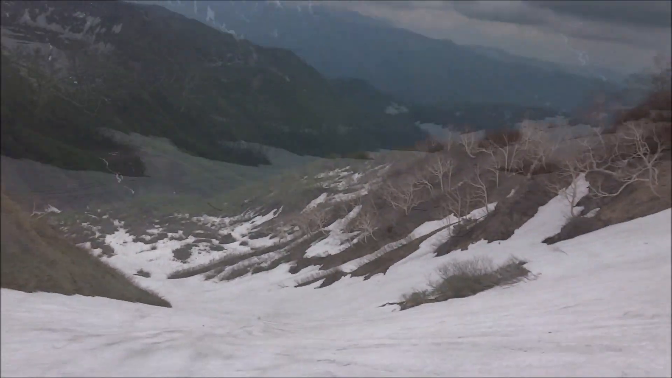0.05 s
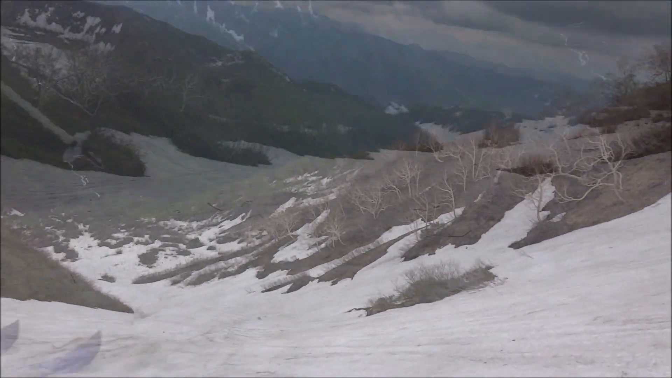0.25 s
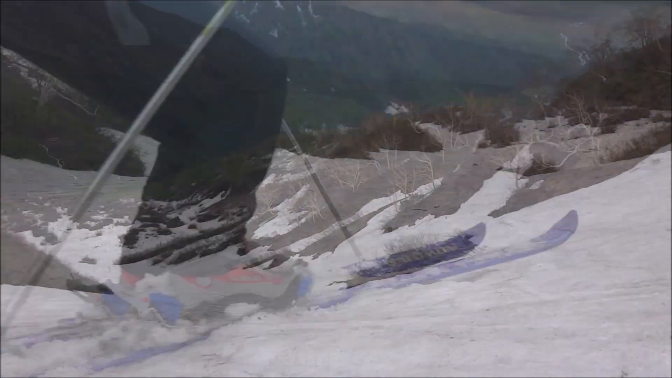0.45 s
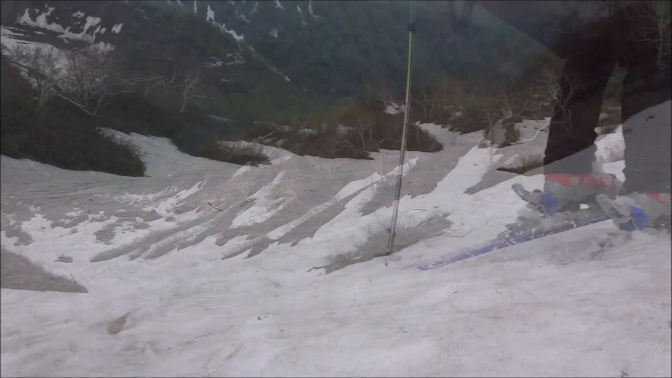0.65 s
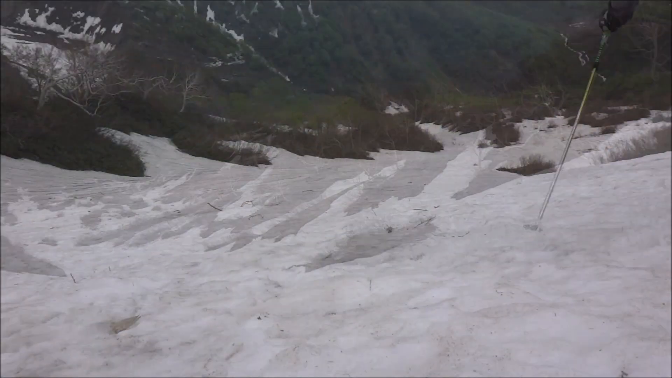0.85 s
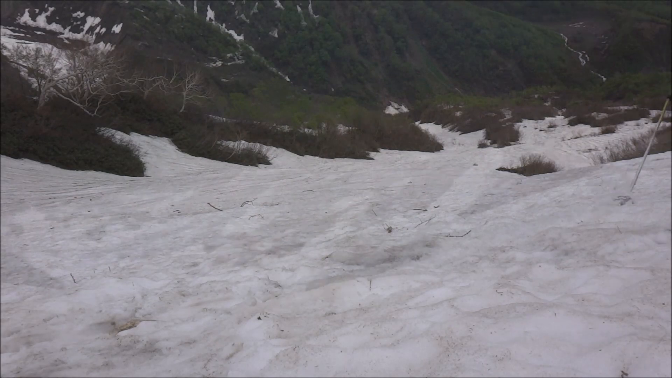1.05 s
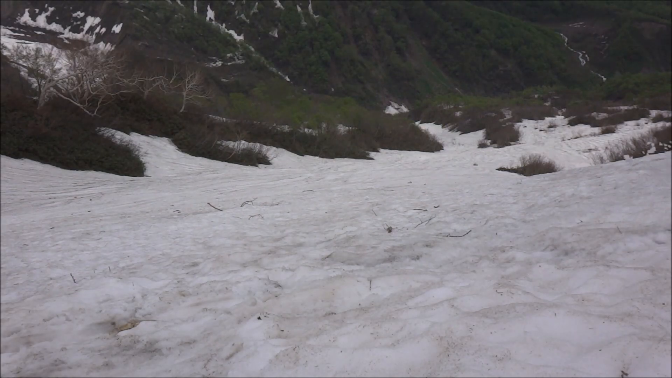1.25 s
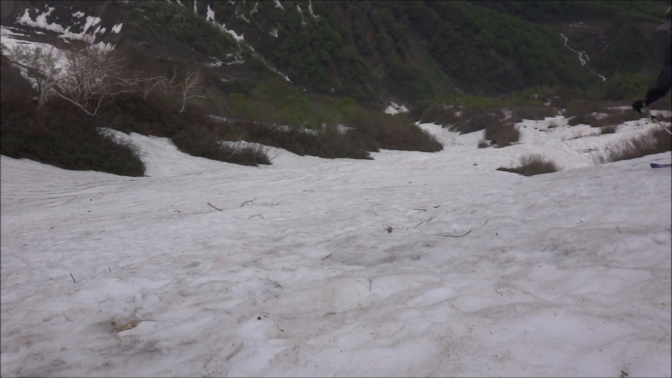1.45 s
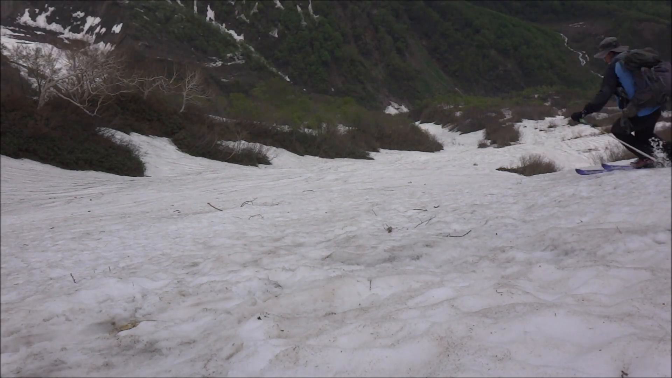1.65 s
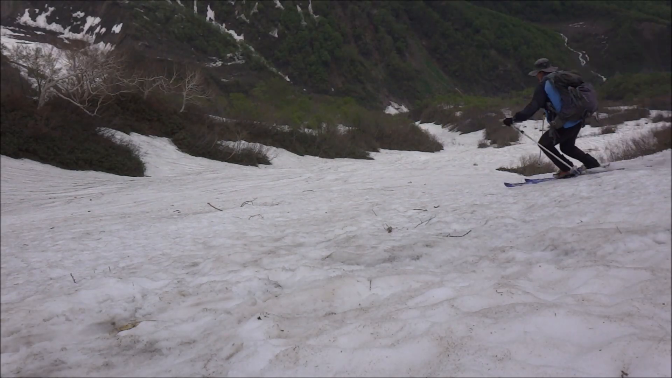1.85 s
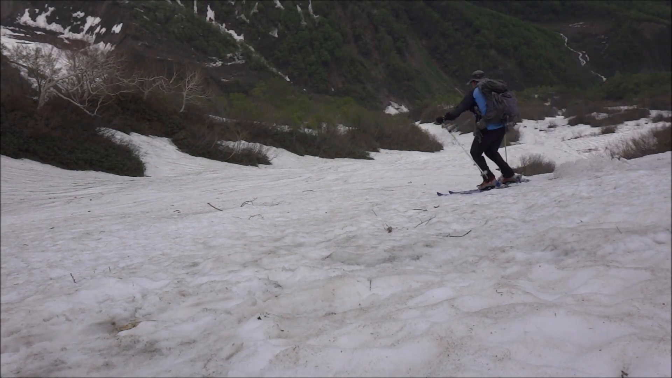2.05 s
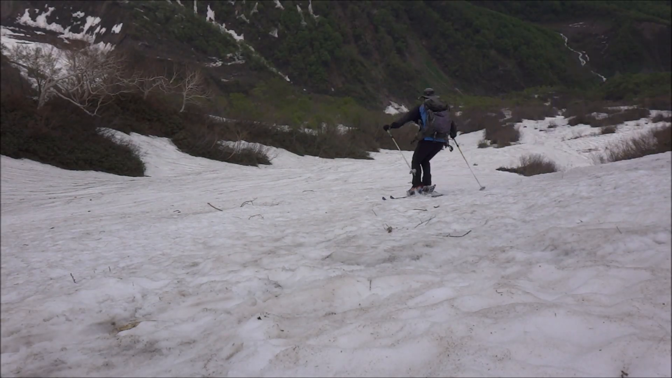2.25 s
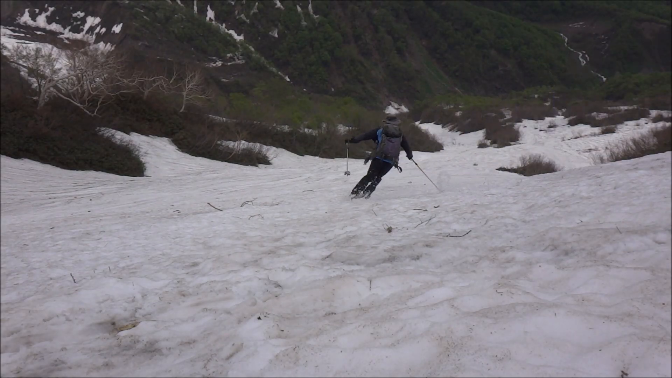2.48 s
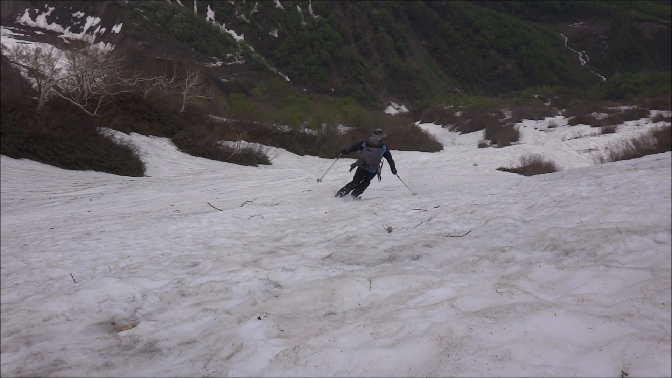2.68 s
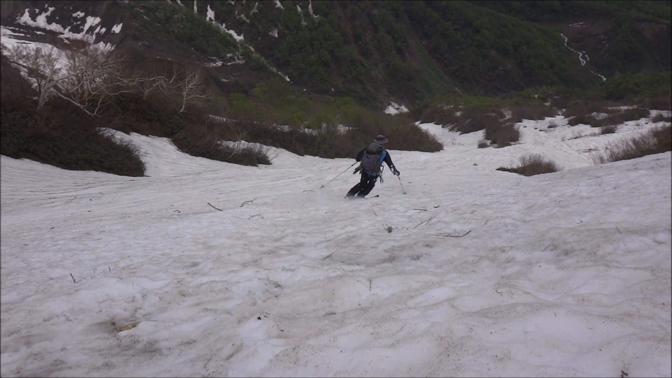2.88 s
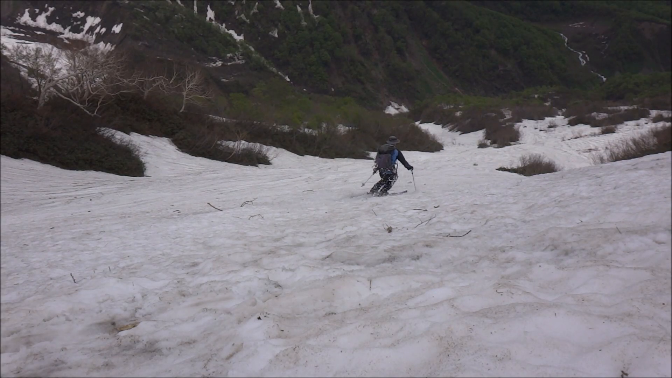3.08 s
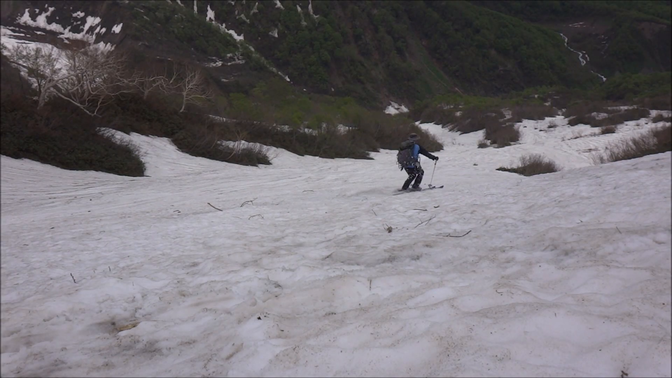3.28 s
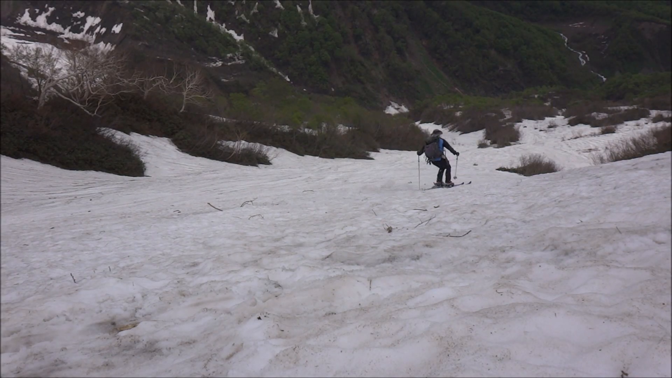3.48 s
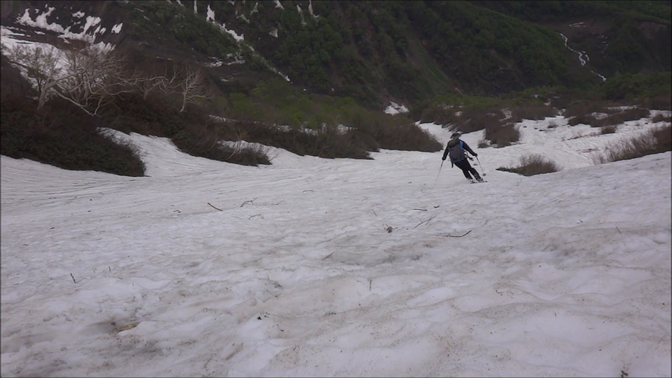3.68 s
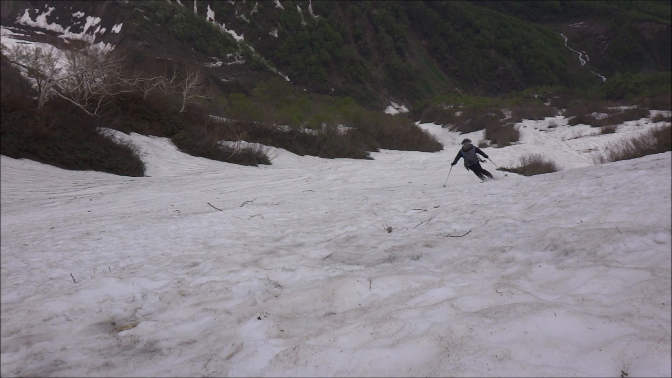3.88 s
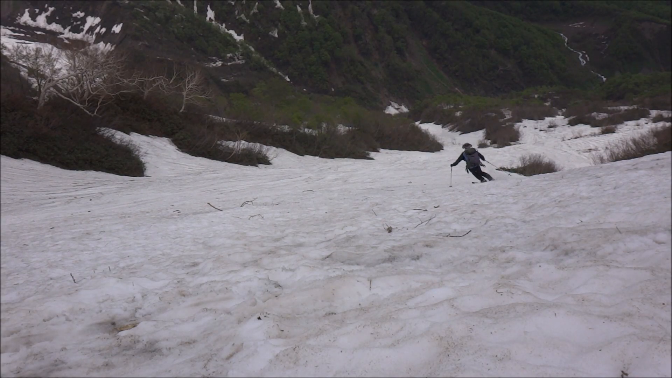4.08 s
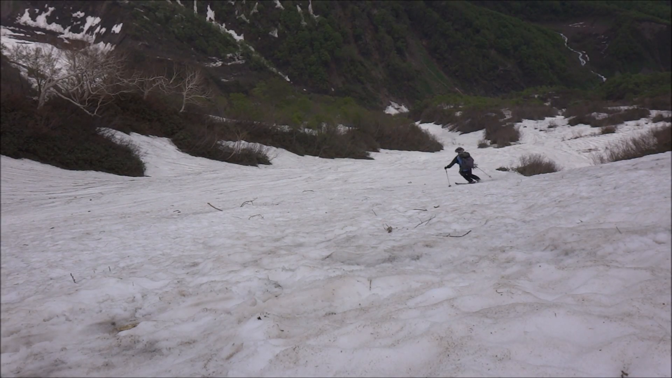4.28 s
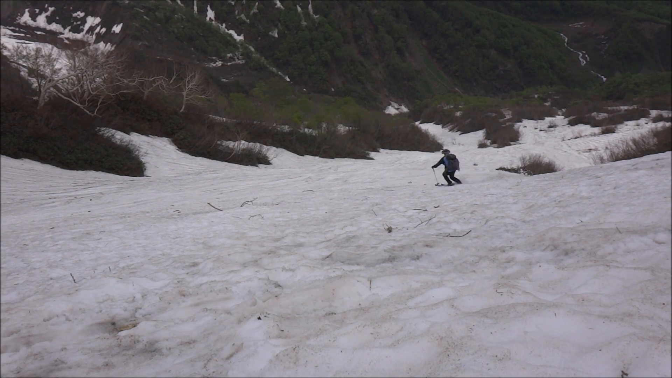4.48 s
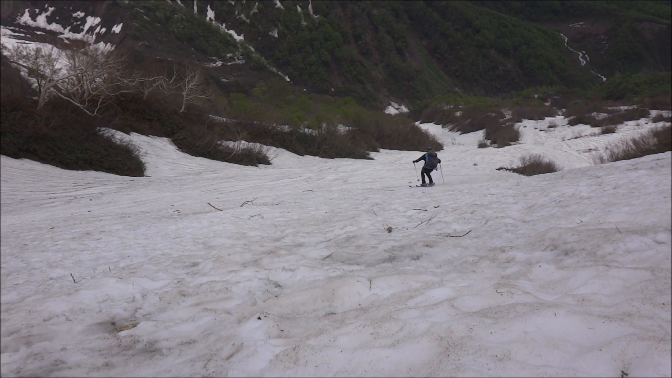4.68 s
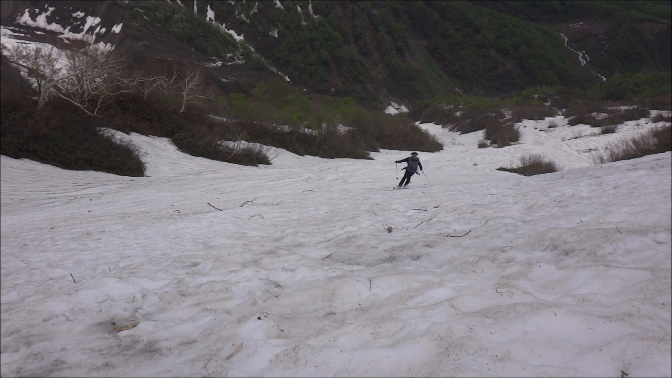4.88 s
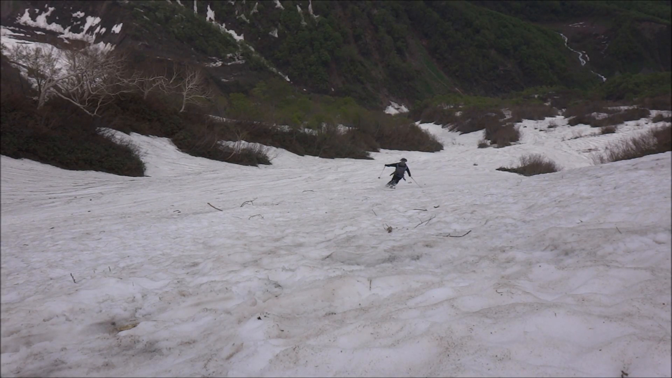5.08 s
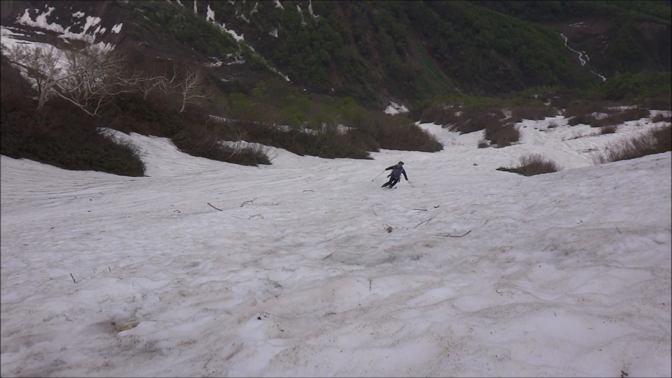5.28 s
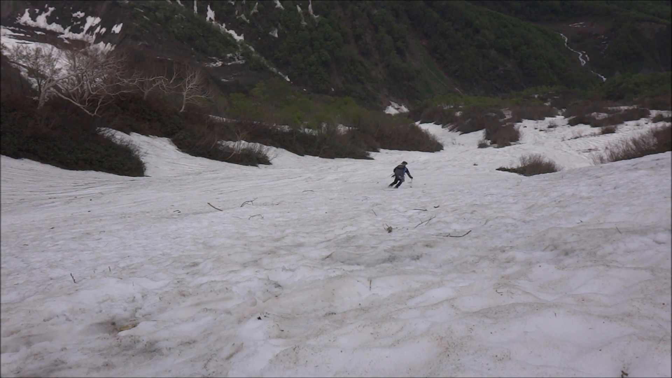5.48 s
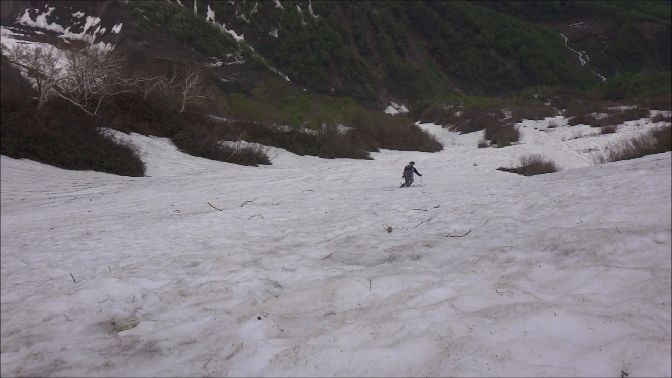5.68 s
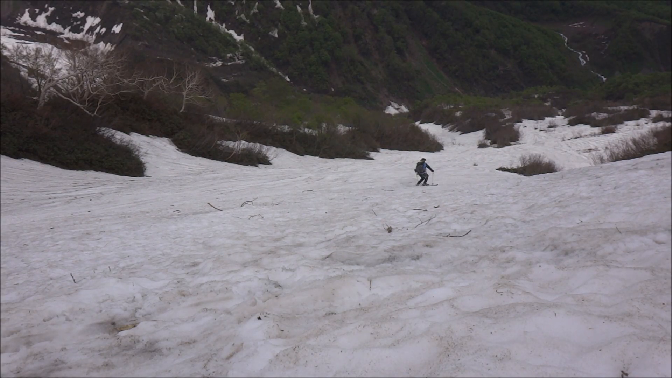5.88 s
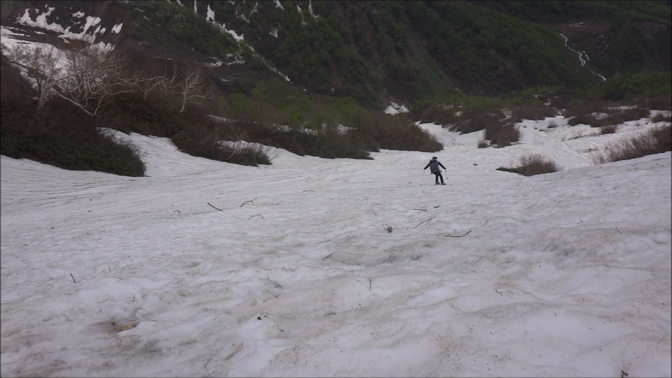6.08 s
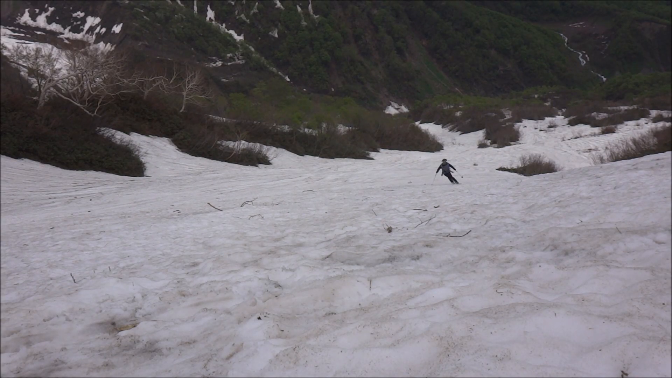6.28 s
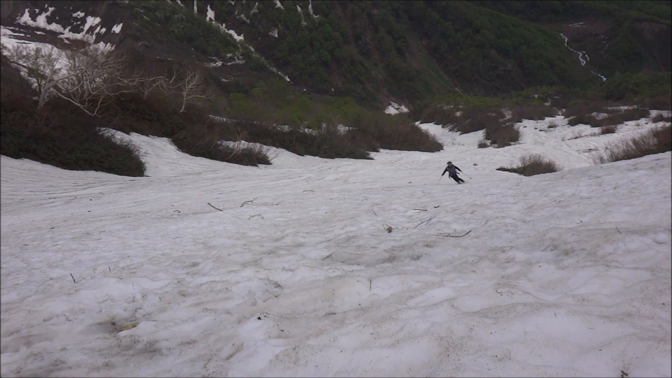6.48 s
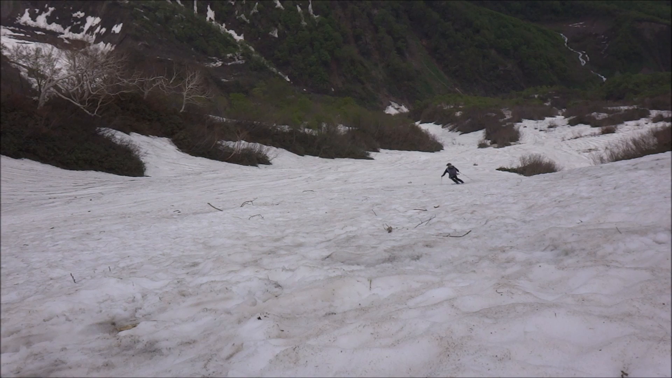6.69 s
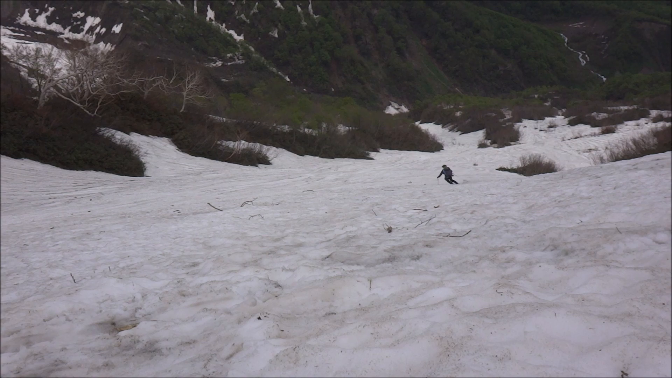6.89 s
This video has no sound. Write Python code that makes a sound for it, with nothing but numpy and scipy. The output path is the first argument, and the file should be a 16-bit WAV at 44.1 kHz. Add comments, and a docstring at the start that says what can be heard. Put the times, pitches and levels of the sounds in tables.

```python
"""Skis slide past on wet spring snow; after an abrupt cut they carve away down the slope.
Their sound is noise from fine spray, crushed grains and dragging boards. Wind eddies buffet the
two microphone ports, a few dry ticks ring them, two birds whistle in the scrub and the valley
hums far off."""
import sys
import numpy as np
from scipy import signal
from scipy.fft import rfft, irfft, next_fast_len
from scipy.io import wavfile
from scipy.ndimage import uniform_filter1d, map_coordinates

SR = 44100
rng = np.random.default_rng(int(sys.argv[2]) if len(sys.argv) > 2 else 0)


def log_audio(samples):
    """Write samples as a 16-bit WAV file to the path given in sys.argv[1]."""
    # one column per channel
    frames = np.atleast_2d(samples).T
    # limit to full scale, then quantise
    limited = np.clip(frames, -1, 1)
    pcm = np.round(limited * 32767).astype(np.int16)
    wavfile.write(sys.argv[1], SR, pcm)


N = 306054

# Coherence of distant sound. Each row: frequency in Hz, left-right correlation.
FAR_COHERENCE = [(500, .2), (1200, .4), (2500, 0.43), (5400, 0.863), (11000, 0.953)]


def amp(db):
    return 10 ** (np.asarray(db) / 20)


def unit_rms(x):
    return x / np.sqrt(np.mean(x ** 2) + 1e-20)


def log_interp(points, hz):
    f, values = np.transpose(points)
    return np.interp(np.log(hz + 1), np.log(f + 1), values)


def curves(rows):
    """Linear interpolation: one value per sample for each column after the time."""
    times, *columns = np.transpose(rows)
    return [np.interp(np.arange(N) / SR, times, column) for column in columns]


def wobble(rate):
    """Smooth random modulation: a spline with `rate` knots a second."""
    return map_coordinates(rng.standard_normal(int(N * rate / SR) + 4), [np.arange(N) * rate / SR])


def pan(pan_db):
    """Level difference: two gains, the left pan_db above the right."""
    return amp(np.array([pan_db / 2, -pan_db / 2]))


def filtered(x, response):
    """Linear filtering: the spectrum of x times a frequency response."""
    size = next_fast_len(N + SR // 2)
    return irfft(rfft(x, size) * response(np.fft.rfftfreq(size, 1 / SR)), size)[..., :N]


def rush(spectrum, coherence, patchy_db, grain_db=0):
    """Modulated stereo noise of rms 1: fast gain changes make grains, time-frequency ones patches."""
    def mid_side_response(hz):
        angle = np.arccos(np.clip(log_interp(coherence, hz), -1, 1)) / 2
        return amp(log_interp(spectrum, hz)) * [np.cos(angle), np.sin(angle)]

    grains = rng.standard_normal((2, N)) * amp(grain_db * wobble(1500))
    frames = signal.stft(grains, nperseg=512)[2]
    patches = uniform_filter1d(rng.standard_normal(frames.shape[1:]), size=8, axis=0)
    patches = unit_rms(uniform_filter1d(patches, size=10, axis=1))
    pair = signal.istft(frames * amp(patchy_db * patches), nperseg=512)[1][:, :N]
    mid, side = filtered(pair, mid_side_response)
    return unit_rms(np.array([mid + side, mid - side]))


def valley():
    """Ambient noise: the far valley is a steady floor of hum and hiss."""
    # Each row: frequency in Hz, relative spectral density in dB.
    spectrum = [(180, -22.5), (300, -3), (457, -5.5), (2630, -24), (3450, -28), (4190, -6.5), (4660, -18),
                (5670, -7), (8510, -18), (9750, 5), (11000, -12), (14300, -46), (22000, -120)]
    return amp(-44.5) * rush(spectrum, FAR_COHERENCE, patchy_db=0.8)


def bird(notes, pan_db, right_lag_s):
    """Frequency modulation: each whistle is a gliding sine, smeared by scattering in the scrub."""
    # Each entry: a note shape and its pitches in Hz at even steps of time.
    contours = { "rise": [1560, 1350, 1330, 1650, 1950, 2310, 2290], "warble": [2600, 2210, 2330, 2410,
                2050, 1630, 1570, 1550], "arch": [2700, 3150, 3020], "bend": [4350, 4150, 3950, 3700, 2930],
                "pip": [3530, 3530], "drop": [4400, 3950, 3150, 2640], "vee": [6660, 5750, 5230, 5750, 6650,
                6700], "slide": [5580, 4980, 4250], "thin": [7540, 7330, 7110], "chip": [5400, 4740, 4130],
                "hook": [6390, 6650, 6520], "slur": [6750, 6620, 6050, 5380], "level": [4130, 4080, 4010],
                "sweep": [8350, 7530, 7120], "flick": [8050, 8340], }
    attack_s, release_s, echo_t60_s, echo_db = 0.006, 0.0078, 0.1, -9
    song = np.zeros(N + SR)
    for start, length, db, swell_db, shape in notes:
        t = np.arange(0, length, 1 / SR)
        progress = t / length
        path = np.pad(np.array(contours[shape], float), 1, mode="reflect", reflect_type="odd")
        hz = map_coordinates(path, [1 + progress * (len(contours[shape]) - 1)], order=2)
        fade = np.clip(np.minimum(t / attack_s, (length - t) / release_s), 0, 1)
        tone = np.sqrt(2) * np.sin(2 * np.pi * np.cumsum(hz) / SR)
        song[round(start * SR):][:len(t)] += amp(db + swell_db * (progress - 0.5)) * fade * tone
    direct = filtered(song[:N], lambda f: np.exp(1j * np.pi * f * right_lag_s * np.array([[1], [-1]])))
    tail = rng.standard_normal((2, SR // 5)) * amp(-60 * np.arange(SR // 5) / SR / echo_t60_s)
    echo = signal.fftconvolve(song[None], tail / np.linalg.norm(tail[0]), axes=1)[:, :N]
    return direct * pan(pan_db)[:, None] + amp(echo_db) * echo


def birds():
    """Differences of level and arrival time set a low and a high singer apart."""
    # Each row: start in seconds, length in seconds, level in dB, swell over the note in dB, shape.
    low_notes = [(2.742, 0.066, -49, 25, "rise"), (2.87, 0.086, -48.5, -11, "warble"),
                 (4.24, .05, -54, 0, "arch"), (4.345, 0.074, -48.5, 0, "bend"),
                 (4.466, .014, -52, 0, "pip"), (4.483, .047, -49, -8, "drop"), (4.572, .014, -50, 0, "pip"),
                 (4.587, 0.044, -51, -9, "drop"), (4.678, .014, -54, 0, "pip"),
                 (4.691, .048, -51, -6, "drop"), (4.78, .014, -52, 0, "pip"),
                 (4.795, 0.043, -52, -10, "drop"), (4.89, 0.015, -52, 0, "pip"),
                 (4.904, .043, -52.5, -12, "drop"), (5.016, 0.037, -55, -7, "drop")]
    high_notes = [(5.18, .062, -42.5, 2, "vee"), (5.296, .08, -44.5, 0, "slide"),
                  (5.585, 0.13, -46, 3, "thin"), (5.766, 0.04, -46, 1, "chip"),
                  (5.837, 0.036, -43, 2, "chip"), (5.906, 0.041, -41.5, 1, "chip"),
                  (5.979, 0.044, -43.5, 2, "chip"), (6.075, .04, -52, 0, "hook"),
                  (6.122, 0.061, -44, 16, "slur"), (6.225, 0.089, -50.5, 5, "level"),
                  (6.407, 0.059, -46, 14, "sweep"), (6.59, .07, -47, 18, "sweep"),
                  (6.725, 0.03, -52, 0, "flick"), (6.785, 0.069, -43.5, 14, "sweep"),
                  (6.885, .046, -41.5, 8, "chip")]
    low = bird(low_notes, pan_db=1.5, right_lag_s=1.5e-5)
    return low + bird(high_notes, pan_db=-2.5, right_lag_s=4e-5)


def ticks():
    """Impulse response: each sharp blow rings two damped modes of the microphone ports."""
    # Each row: start in seconds, level in dB.
    blows = [(2.5594, -25), (5.0686, -31), (5.5263, -18.5), (6.0094, -30)]
    out, t = np.zeros((2, N + SR)), np.arange(SR // 100) / SR
    ring = np.cos(2 * np.pi * 9500 * t) * amp(-60 * t / 0.006)
    ring += 0.486 * np.cos(2 * np.pi * 5000 * t) * amp(-60 * t / 0.0038)
    for start, db in blows:
        out[:, round(start * SR):][:, :len(t)] += amp(db) * pan(3)[:, None] * ring
    return out[:, :N]


def eddy_slaps():
    """Damped oscillation: eddies slap the ports. Returns the sound and the envelope of their wakes."""
    # Each row: start in seconds, level in dB, initial pitch in Hz, pan in dB.
    eddies = [(0.108, -18.5, 131.5, 10), (0.262, -21, 155, -10), (0.361, -13, 120, -5),
              (0.466, -16, 151.7, -2.5), (0.58, -10.5, 100, 7), (0.611, -19, 145, -2), (.68, -22, 121, -13),
              (0.864, -17, 258, 8), (0.911, -17, 200, 2.5), (1.119, -16, 130, 3), (1.356, -20.5, 153, 4),
              (1.436, -14, 105, 7), (1.859, -29, 91, 16), (2.13, -20, 130, -6), (2.409, -25, 100, 8),
              (2.757, -29, 80, 10), (2.92, -27, 188, 9), (3.022, -22.5, 132, 0), (3.261, -23, 101, -0.5),
              (3.536, -17, 121, -1), (3.969, -13.5, 180, -1), (4.085, -16.5, 137.6, 1.0),
              (4.184, -7.5, 156, -2.0), (4.235, -14, 90, 12), (4.319, -34, 90, 2), (4.755, -11, 198, -2),
              (4.843, -10.5, 180, -2), (4.89, -17, 102, 9), (4.961, -17.5, 102, 5),
              (5.015, -17.5, 131.6, 8.5), (5.46, -25, 100, 10), (5.554, -16, 159, -14), (5.6, -22, 169, 8),
              (5.949, -22, 90, -7), (6.33, -21, 100, -7), (6.385, -13.5, 153, -10), (6.573, -20, 140, 5.5),
              (6.663, -20, 110, -0.5), (6.9, -26, 80, 1)]
    slap_t60_s, wake_t60_s = 0.065, 0.13
    snap_ratio, snap_db, snap_t60_s = 2.2, -11, 0.042  # the sharper front of a slap
    slaps, wake, t = np.zeros((2, N + SR)), np.zeros(N + SR), np.arange(SR // 5) / SR
    envelope = (1 - np.exp(-(t / 0.0021) ** 2)) * amp(-60 * t / slap_t60_s)
    for start, db, hz, pan_db in eddies:
        phase = rng.uniform(0, 2 * np.pi, (2, 1))
        swing = np.sin(2 * np.pi * hz * t / (1 + 6 * t) + phase)  # the eddy slows as it breaks up
        snap = amp(snap_db - 60 * t / snap_t60_s) * np.sin(2 * np.pi * snap_ratio * hz * t - phase)
        at = round(start * SR)
        slaps[:, at:at + len(t)] += amp(db) * pan(pan_db)[:, None] * (swing + snap) * envelope
        wake[at:at + len(t)] += amp(db - 60 * t / wake_t60_s) * (1 - np.exp(-t / 0.0031))
    return slaps[:, :N], wake[:N]


def wind():
    """Turbulent pressure: large eddies rumble on both ports alike, small ones flutter on each alone."""
    # Each row: time in seconds, rumble level in dB, flutter level in dB.
    gusts = [(0.0, -30.5, -44), (0.13, -30.5, -35), (0.69, -26.5, -27.5), (0.75, -35.5, -40),
             (0.87, -30.5, -25), (1.14, -22.5, -23.5), (1.39, -31, -37), (1.45, -27.5, -22.5),
             (1.49, -34, -45), (1.78, -36.5, -54), (2.16, -30, -37.5), (2.24, -45.5, -48),
             (2.63, -32.5, -47), (3.3, -33.5, -41), (3.46, -41, -53), (3.56, -35, -35), (3.61, -38.5, -49),
             (3.79, -37, -49.5), (4.1, -26.5, -29.5), (4.16, -41, -50), (4.18, -42, -18),
             (4.25, -25.5, -37), (4.39, -37, -47), (4.48, -26.5, -34), (4.62, -37, -52),
             (4.79, -27.5, -35.5), (5.04, -36.5, -34.5), (5.1, -40.5, -48.5), (5.53, -32.5, -40),
             (5.57, -40, -23.5), (5.66, -33.5, -42.5), (5.99, -33, -38), (6.18, -36, -51), (6.4, -27, -31),
             (6.55, -38.5, -55), (6.57, -33, -38.5), (6.88, -41, -47), (6.94, -28, -41)]
    # Each row: frequency in Hz, relative spectral density in dB.
    rumble_spectrum = [(10, -24), (22, -4.5), (35, -2), (55, -2), (80, -4), (120, -9), (250, -43),
                       (500, -91)]
    flutter_spectrum = [(40, -50), (90, -6), (120, -1.5), (180, -3.5), (260, -8.5), (400, -26), (700, -49),
                        (1500, -80)]
    wake_rumble_db, wake_flutter_db, left_bias_db, sway_db = -10, -14.5, 0.5, 1.5
    rumble_db, flutter_db = curves(gusts)
    shared_lumps = np.tanh(wobble(16))
    rumble = rush(rumble_spectrum, coherence=[(25, 0.9), (60, 0.97), (120, 0.35)], patchy_db=0.34)
    rumble = unit_rms(amp(3.3 * shared_lumps) * rumble)
    port_lumps = np.tanh([wobble(30), wobble(30)])
    flutter = rush(flutter_spectrum, coherence=[(90, 0.83), (270, -0.077)], patchy_db=1.14)
    flutter = unit_rms(amp(4.3 * shared_lumps + 4.8 * port_lumps) * flutter)
    slaps, wake = eddy_slaps()
    rumble *= amp(rumble_db) + amp(wake_rumble_db) * wake
    flutter *= amp(flutter_db) + amp(wake_flutter_db) * wake
    return (rumble + flutter) * pan(left_bias_db + sway_db * wobble(12)) + slaps


def skis(levels, coherence, grain_db, bumpy_db):
    """Friction and fracture noise: spray, crushed grains and dragging boards, all shaken by bumps."""
    # Each row: frequency in Hz, relative spectral density in dB.
    spray_spectrum = [(5000, -58), (7000, -16), (8400, -9), (9300, -2.5), (10000, 3), (10600, -4.5),
                      (11000, -13), (12000, -13)]
    crunch_spectrum = [(1200, -32), (2500, -14.5), (3800, -8.5), (5000, -3.5), (6200, 0.5), (7500, -3.5),
                       (9000, -9.5), (12000, -14)]
    drag_spectrum = [(150, -15), (350, 1.5), (550, -0.5), (900, -1), (1800, -2.5), (2800, -5.5), (4500, -8),
                     (9000, -30)]
    spray_db, crunch_db, drag_db, pan_db = curves(levels)
    bumps_db = bumpy_db * (wobble(9) + 0.38 * wobble(21.97))
    spray = amp(spray_db + bumps_db) * rush(spray_spectrum, coherence, 0.946, grain_db)
    crunch = amp(crunch_db + bumps_db) * rush(crunch_spectrum, coherence, 1.16, grain_db)
    drag = amp(drag_db + bumps_db) * rush(drag_spectrum, coherence, 1.83, grain_db)
    return (spray + crunch + drag) * pan(pan_db)


def ski_run():
    """Rapid crossfade: an edit cuts the loud close slide short, and faint, far carving follows."""
    # Each row: time in seconds, then spray level, crunch level, drag level and pan, all in dB.
    near_levels = [(0.0, -22.5, -25.5, -36, 4.5), (0.18, -22, -24, -30, 2.5), (0.3, -22, -21.5, -30, 2.5),
                   (0.52, -17, -22.5, -30.5, 1), (0.68, -20, -23.5, -28, 2), (.76, -17.5, -23, -31, 0),
                   (0.88, -20, -23, -26.5, 0.5), (1.0, -19, -23, -30.5, 0), (1.3, -21.5, -25, -30, 1.3)]
    far_levels = [(1.31, -36, -39, -46, -8), (1.36, -33, -35.5, -52, -8), (1.42, -26.5, -32, -51.5, -8),
                  (1.55, -26.5, -34, -47.5, -6), (1.6, -25.5, -28.5, -45.5, -5),
                  (1.67, -30.5, -34.5, -51, -5), (1.76, -26.5, -35, -51, -4.5),
                  (2.05, -34.5, -43, -56, -3.5), (2.17, -38.5, -47, -60.5, -2.5),
                  (2.27, -30, -43.5, -61.5, -1), (2.35, -34.5, -41, -58, -1), (2.7, -33.5, -38, -57, -1),
                  (2.96, -33, -42, -58, -1), (3.27, -28.5, -39.5, -56.5, -1), (3.54, -40, -51, -58, -1),
                  (3.69, -36.5, -46.5, -59, -2), (4.0, -39.5, -48, -57, -2),
                  (4.22, -31.5, -41.5, -58.5, -2), (4.41, -28.5, -38, -60, -2),
                  (4.54, -37, -47.5, -57, -1.5), (4.88, -35.5, -46.5, -58.5, -2),
                  (5.45, -46.5, -46, -60.5, -2.5), (5.7, -38, -47.5, -62, -2), (5.9, -42, -48, -61, -3),
                  (6.0, -49, -56, -59, -3), (6.2, -48, -52.5, -61.5, -2.5), (6.94, -44.5, -45, -59, -3)]
    # Each row: frequency in Hz, left-right correlation.
    near_coherence = [(500, 0.4), (1200, 0.77), (5400, 0.62), (11000, 0.71)]
    cut_s, crossfade_s = 1.306, 0.004
    near_share = np.clip((cut_s - np.arange(N) / SR) / crossfade_s, 0, 1)
    near = skis(near_levels, near_coherence, grain_db=1.0, bumpy_db=0.4)
    far = skis(far_levels, FAR_COHERENCE, grain_db=1.5, bumpy_db=0.7)
    return near_share * near + (1 - near_share) * far


def scene():
    """Superposition: the pressures of all sources add."""
    return valley() + birds() + ski_run() + wind() + ticks()


def record(dry):
    """Band limiting: a steep low-pass removes the highest treble."""
    top_hz = 11050
    return filtered(dry, lambda hz: amp(-60 * np.clip((hz - top_hz) / 150, 0, 2)))


dry = scene()
out = record(dry)
log_audio(out)
```